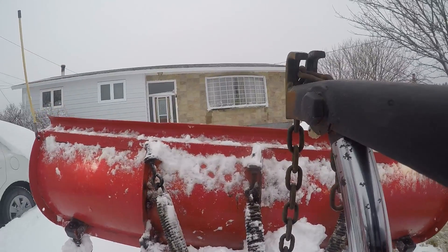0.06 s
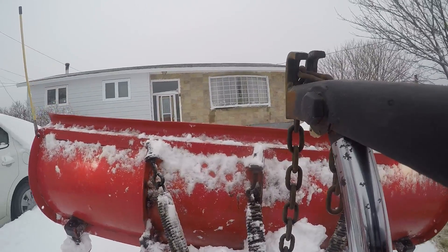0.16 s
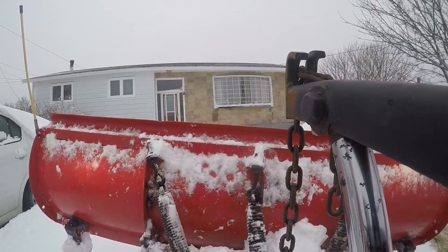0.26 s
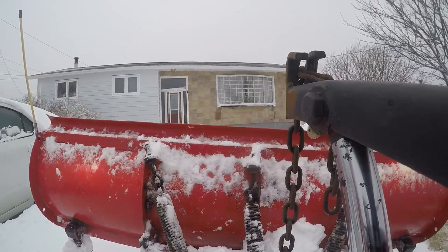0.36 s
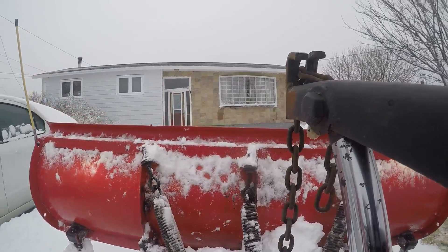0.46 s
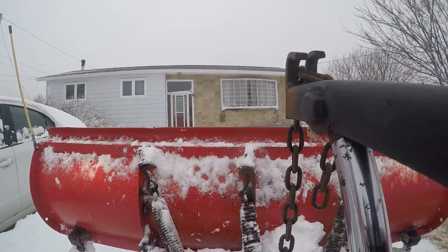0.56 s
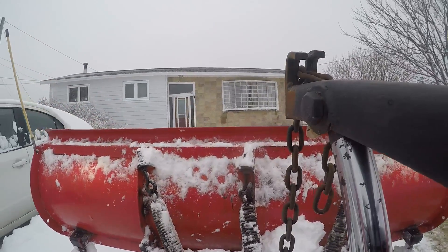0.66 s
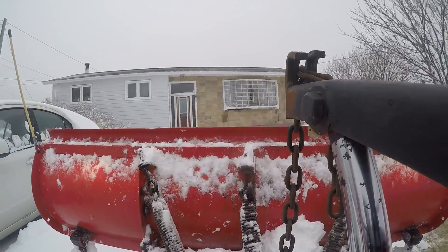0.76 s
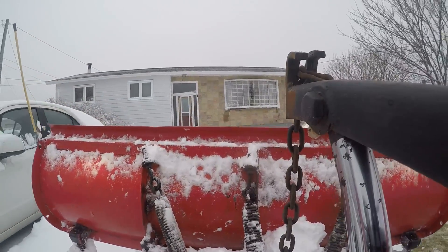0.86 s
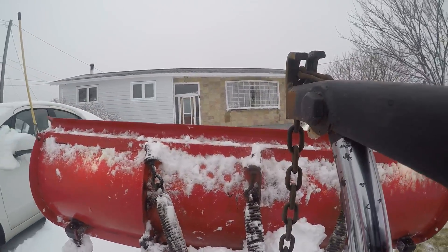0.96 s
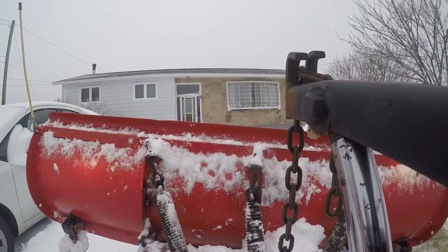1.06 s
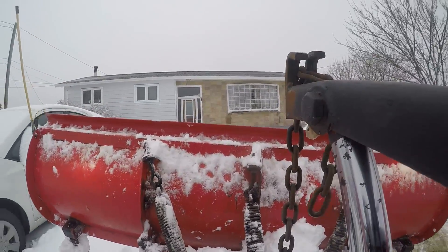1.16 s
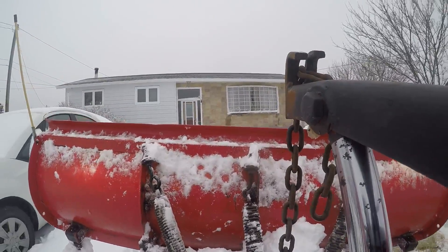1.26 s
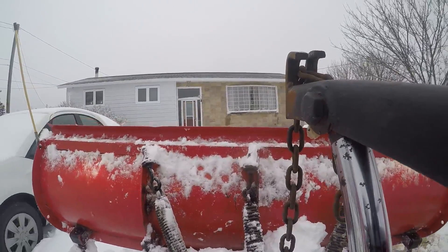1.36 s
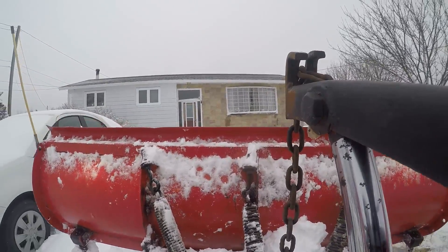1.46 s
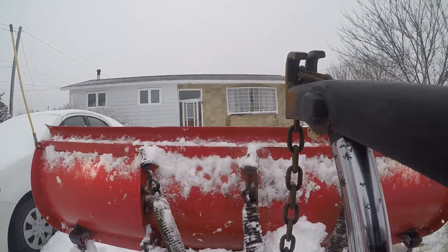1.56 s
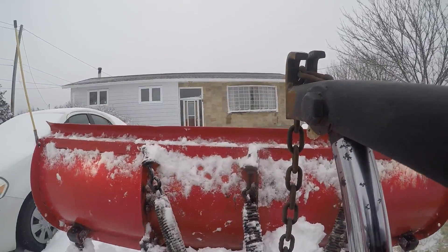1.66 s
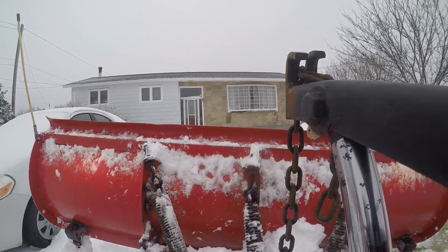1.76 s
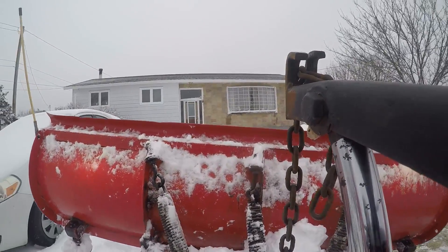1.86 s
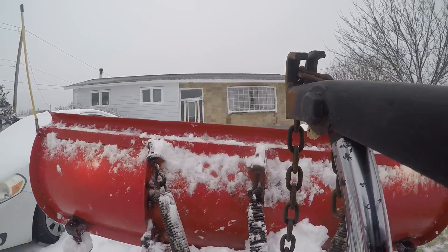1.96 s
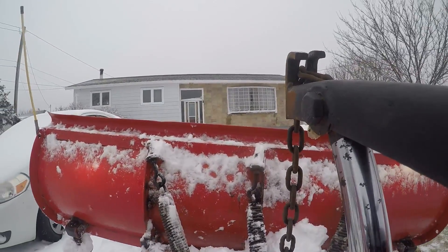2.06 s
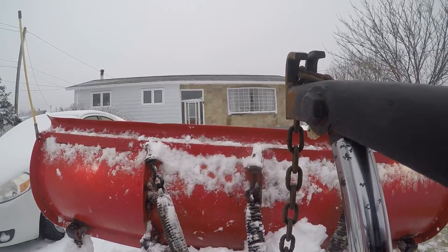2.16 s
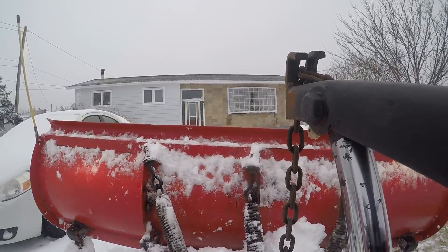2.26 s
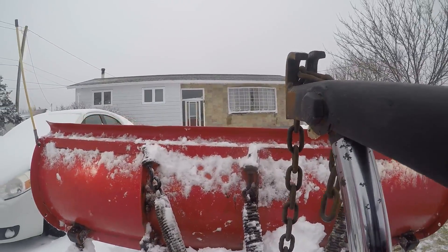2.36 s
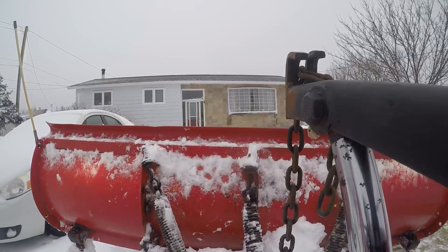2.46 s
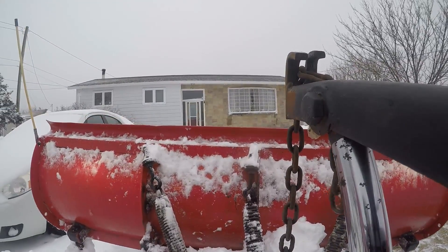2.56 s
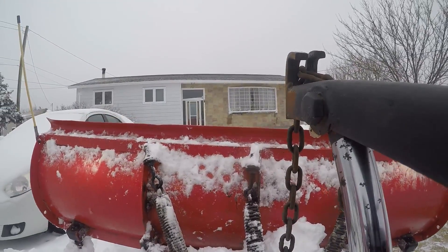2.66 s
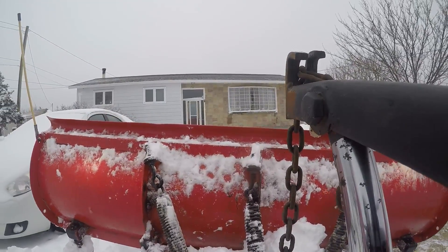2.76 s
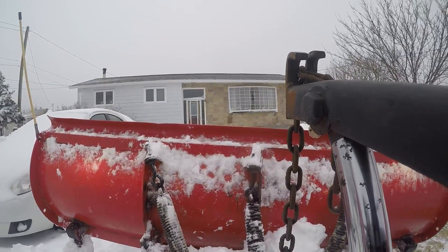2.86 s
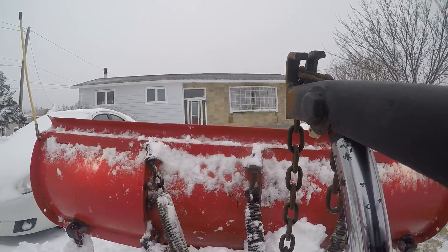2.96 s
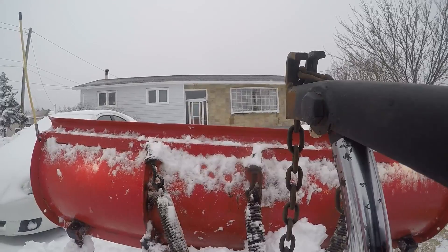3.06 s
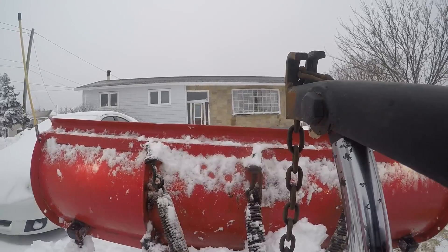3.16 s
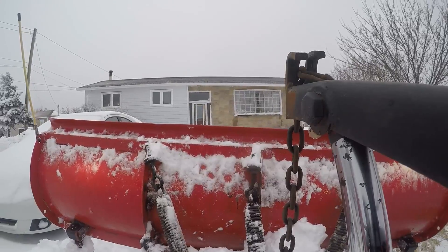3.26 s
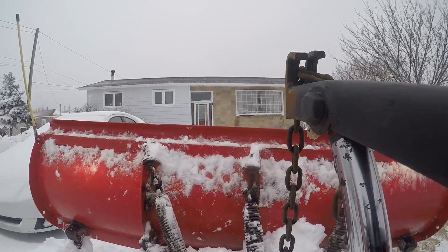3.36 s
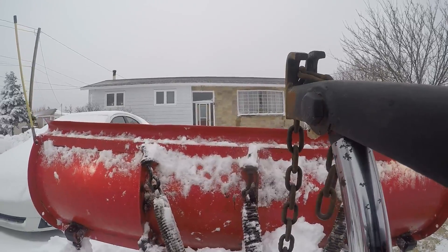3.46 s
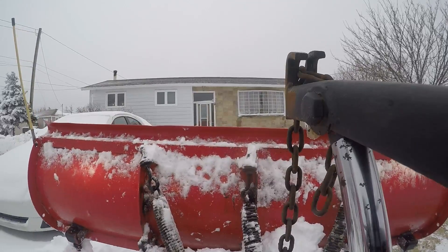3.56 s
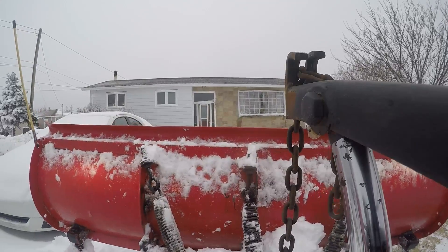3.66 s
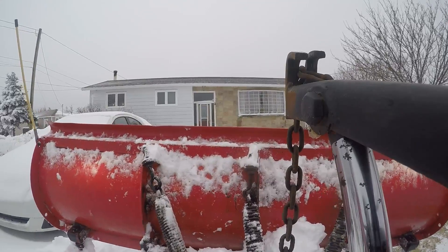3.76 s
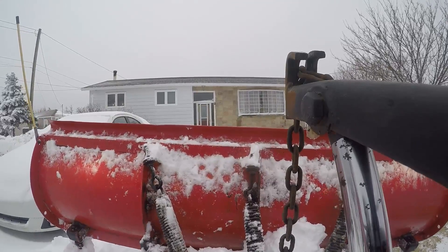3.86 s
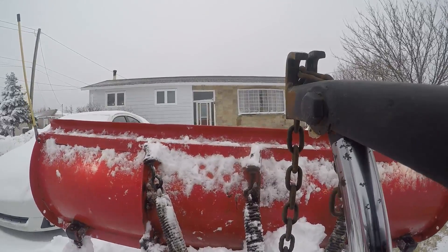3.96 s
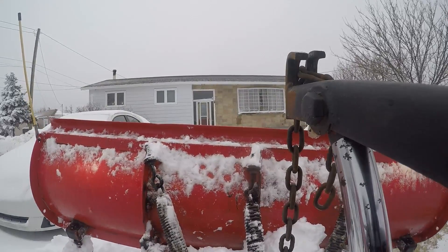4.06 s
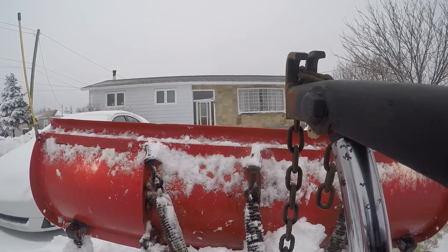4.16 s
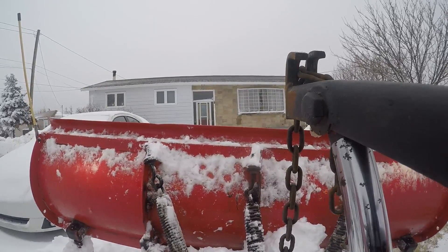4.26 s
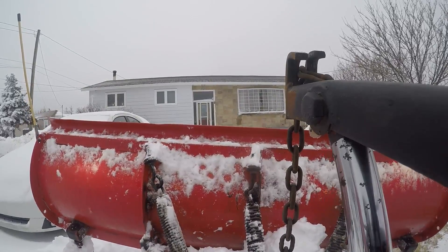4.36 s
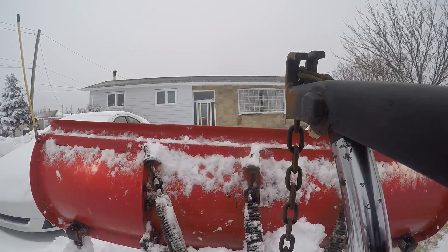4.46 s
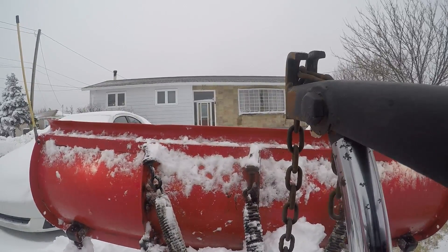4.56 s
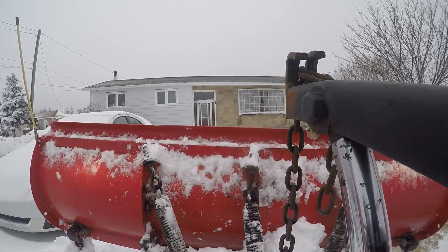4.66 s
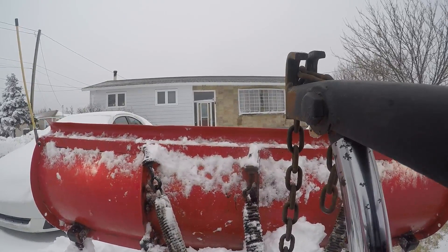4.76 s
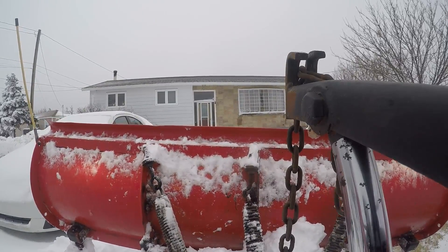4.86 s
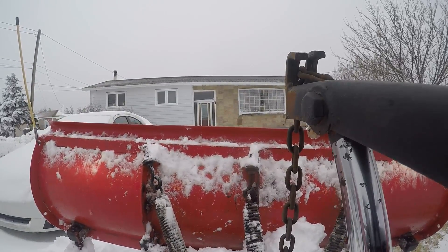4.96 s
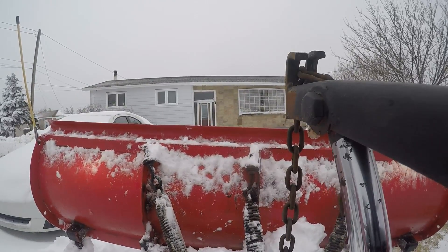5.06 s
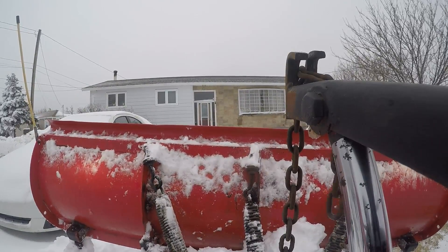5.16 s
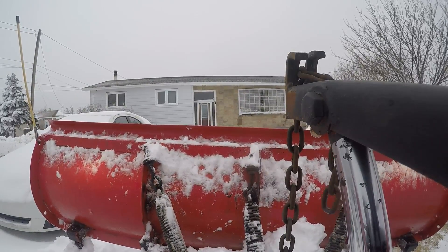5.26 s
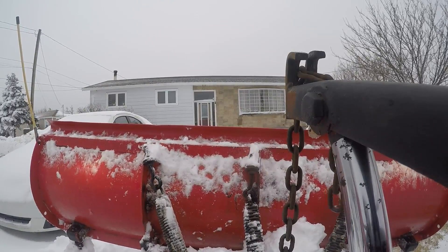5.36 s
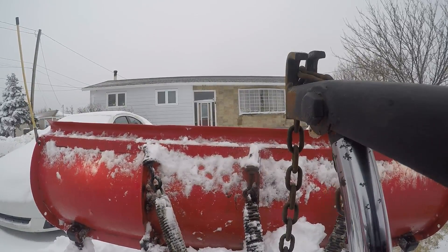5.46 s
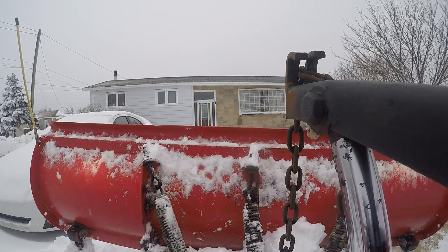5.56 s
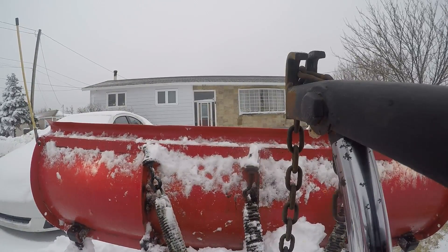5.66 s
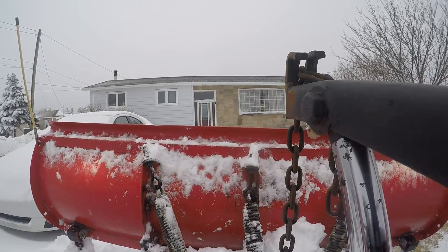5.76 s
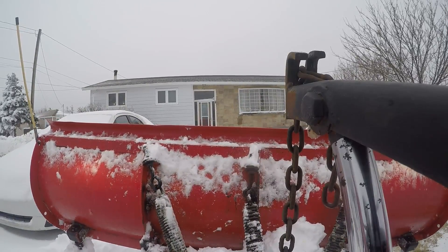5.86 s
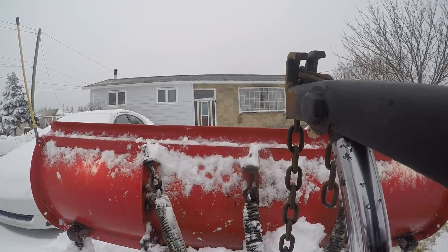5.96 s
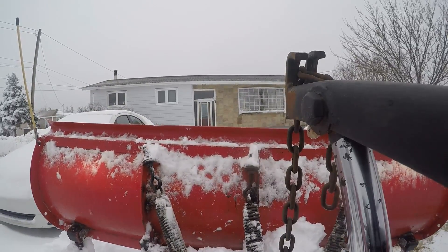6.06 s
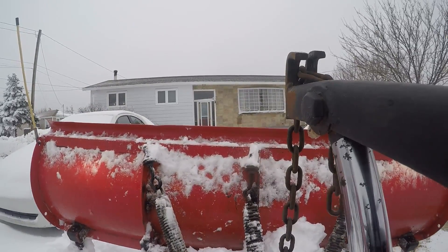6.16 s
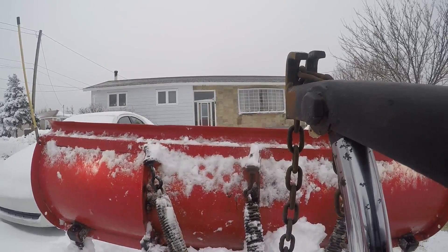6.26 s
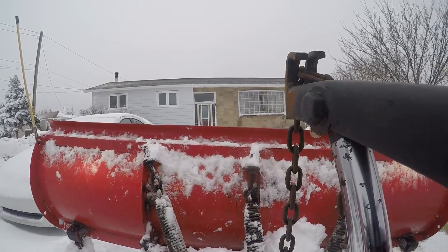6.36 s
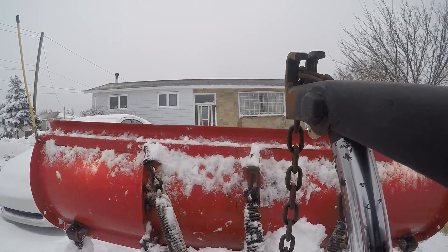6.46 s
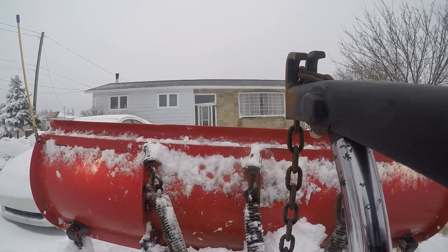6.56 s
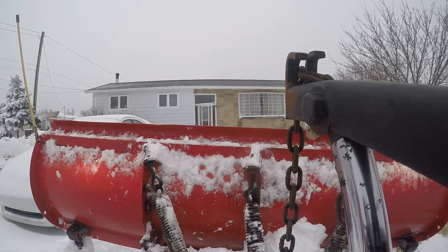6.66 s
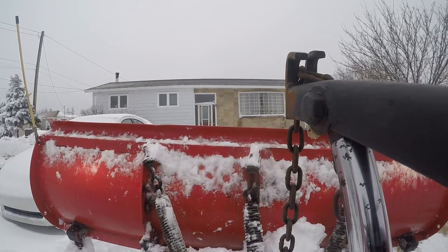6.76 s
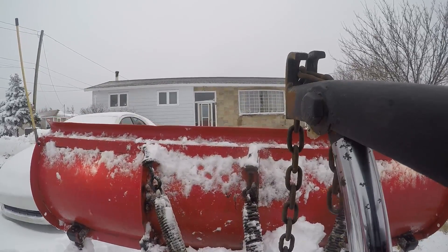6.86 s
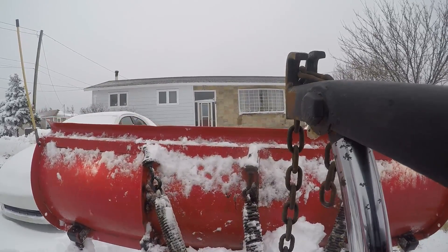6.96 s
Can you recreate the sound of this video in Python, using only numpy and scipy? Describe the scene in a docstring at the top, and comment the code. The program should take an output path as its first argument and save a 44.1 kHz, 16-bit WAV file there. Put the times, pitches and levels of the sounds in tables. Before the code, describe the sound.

A low, beating engine rumble with breathy fan noise runs throughout. Early on, rusty links clink, scrape and squeak, building to a cluster of violent, clipped metal bangs with short dull thuds. The throttle swells, then a gliding hydraulic moan, groaning packed snow, soft jolts and sparse chain ticks follow. The fan swells again, steel rubs, and a few last blade bangs land. Close microphone on the vehicle, open snowy driveway, no echo.

```python
"""Plow truck on a snowy driveway

A plow truck creeps along with its blade raised, heard close up from a microphone at the plow mount.
The exhaust throbs as a low note with a beat, and coloured noise makes the fan swell twice with the throttle.
A pump moans as a gliding tone; random fractures crunch the snow, which groans in rough low notes.
Decaying steel modes make the blade knock in its loose pivots, hard enough to overload the microphone,
and the lift chain clink and rattle; filtered grains and gliding notes make it rub, scrape and squeak."""
import sys
import numpy as np
from scipy import signal
from scipy.fft import rfft, irfft
from scipy.io import wavfile
from scipy.ndimage import uniform_filter1d

SR = 44100
rng = np.random.default_rng(int(sys.argv[2]) if len(sys.argv) > 2 else 0)


def store_pcm(level_fs):
    """Save levels as 16-bit WAV."""
    pcm = np.round(np.clip(level_fs, -1, 1) * 32767).astype(np.int16)
    wavfile.write(sys.argv[1], SR, np.atleast_2d(pcm).T)


N = 309141
TIME = np.arange(N) / SR

# note of the exhaust: (time [s], pitch [Hz])
THROB = [(0.0, 43.3), (0.17, 41.41), (2.22, 41.24), (2.71, 45.2), (3.08, 41.8), (3.32, 45.04),
         (4.63, 40.06), (4.84, 45.02), (7.01, 41.5)]
# exhaust throb: (time [s], level before the lope [dB])
EXHAUST = [(0, -8), (.2, -24.5), (.35, -8.5), (.8, -15.5), (1.22, -9.5), (1.49, -32.5), (1.74, -14.5),
           (2.55, -15.5), (3.4, -14.5), (3.68, -18), (3.85, -16.5), (4.05, -20), (4.53, -25.5),
           (4.61, -16.5), (4.98, -22.5), (5.08, -15), (5.17, -21.5), (5.62, -26.5), (6.02, -12),
           (6.3, -12.5), (6.48, -20.5), (6.66, -24), (6.79, -16.5), (7.01, -18.5)]
# engine effort, as the level of the fan against idle: (time [s], level [dB])
EFFORT = [(0, 15.5), (.55, 12.5), (1.17, 7.5), (1.45, -2.5), (2.22, -1.5), (2.62, 16), (2.9, 21),
          (3.42, 10), (4.15, 5.5), (5.45, 8), (6.02, 22), (6.5, 11), (7.01, 4)]
# the body booms as the truck takes up load: (middle [s], length [s], highest level [dB])
SURGES = [(0.358, 0.3, -26.5), (1.08, 0.21, -28), (1.74, 0.17, -29), (2.558, 0.47, -24.5),
          (2.955, 0.51, -26.5), (3.35, 0.38, -15.5), (3.819, 0.13, -23.5), (4.74, 0.16, -29),
          (5.856, 0.18, -29), (6.099, 0.3, -20), (6.521, 0.26, -28.5), (6.754, .12, -16)]
# drone of the truck body on the uneven ground: (time [s], level [dB])
DRONE_LEVEL = [(0, -37.5), (.8, -43.5), (1.08, -37.5), (1.55, -51.5), (2.0, -41), (2.5, -39.5), (3.4, -41),
               (4.15, -39.5), (5.25, -41), (5.7, -44), (6.0, -36), (6.45, -46), (7.01, -39)]
# colours of wallow, body boom, drone, machinery and fan: (frequency [Hz], density [dB per Hz])
WALLOW = [(18, -6), (24, -7), (33, 0), (38, 1), (50, -17.5)]
BOOM = [(18, -6.5), (30, -16), (42, -6), (58, 5.5), (76, -1), (92, -24), (130, -31)]
DRONE = [(85, 0), (105, -2.5), (125, 0), (150, -3), (190, -11), (260, -26), (500, -30.5)]
MACHINERY = [(300, -12), (620, -5), (770, -9), (900, -2.5), (1200, -22.5), (1330, -6), (1440, -2.5),
             (1560, 1.5), (1780, -11.5), (2020, 2.5), (2200, -16.5), (2600, -5.5), (3100, -12), (6000, -18)]
FAN = [(1290, -29.5), (1750, -8.5), (2200, -10.5), (2550, -1), (3050, -10), (3330, -6.5), (3700, -14),
       (4050, -10.5), (4400, -14), (4650, -13), (5400, -14), (5900, -18.5), (6400, -12.5), (6800, -20.5),
       (6970, -20.5), (7200, -28), (7650, -20.5), (8100, -22), (8650, -28.5), (9500, -23), (11200, -30.5),
       (13600, -29.5), (15500, -42)]
# resonances of the plow mount: (frequency [Hz], width [Hz], boost [dB])
MOUNT = [(771, 15.5, 12.5), (1102, 12, 7), (1334, 46, 12), (1573, 45, 4.5), (1753, 98, 12.5), (1967, 20, 6),
         (2413, 39, 4.5), (2760, 18, 6.5)]
# pump under load: (time [s], pitch [Hz], level before trim [dB])
PUMP = [(3.03, 285, -64), (3.12, 246, -40), (3.21, 208, -39), (3.29, 186, -48), (3.36, 190, -77),
        (3.86, 252, -72), (3.93, 243, -48), (4.12, 227, -42.5), (4.3, 222, -45), (4.6, 234, -44),
        (4.85, 248, -46.5), (5.01, 250, -48.5), (5.1, 250, -75)]
# packed snow groans under a tyre: (time [s], length [s], pitch [Hz], level [dB])
GROANS = [(3.539, 0.068, 175, -42.5), (3.774, 0.085, 222.4, -38), (3.874, 0.065, 280, -47.5),
          (4.524, 0.056, 283, -43), (4.662, 0.058, 210, -44.5)]
# tyres on snow: (time [s], level before trim [dB])
TREAD = [(0, -45), (.42, -39.5), (.65, -48.5), (1.03, -38.5), (1.19, -36.5), (1.32, -46.5), (1.45, -51),
         (2.15, -51), (3.0, -48), (5.6, -52.5), (6.15, -43.5), (6.6, -47.5), (7.01, -46)]
# lumps of snow giving way: (time [s], length [s], highest level [dB])
LUMPS = [(0.23, 0.027, -46), (0.298, 0.037, -38), (0.413, 0.014, -26), (0.473, 0.094, -37.5),
         (1.712, 0.021, -23), (3.373, 0.051, -38), (3.455, 0.024, -40.5), (3.77, 0.052, -47),
         (3.839, 0.081, -49), (5.341, 0.05, -45.5)]
# ruts that jolt the body: (time [s], peak before trim [dB])
JOLTS = [(3.378, -25), (3.82, -29), (3.98, -28), (4.14, -23.5), (4.57, -23.5), (4.683, -25.5), (5.011, -27),
         (5.262, -26.5)]
# colour of the snow: (frequency [Hz], density [dB per Hz])
SNOW = [(120, -4.5), (200, 4.5), (300, 3), (440, -6), (620, -10.5), (770, -11), (870, -21), (1020, -6.5),
        (1500, -22.5), (2500, -18.5), (6000, -53)]
# steel rubbing on steel: (time [s], length [s], pitch [Hz], level [dB])
RUBS = [(0.237, 0.11, 1540, -43.5), (1.13, 0.035, 1930, -32.5), (1.188, 0.028, 1980, -37),
        (1.71, 0.023, 1890, -44), (5.461, 0.041, 1780, -44.5), (6.229, 0.21, 1900, -41.5),
        (6.268, 0.18, 1970, -39), (6.77, 0.085, 1980, -47)]
# rusty faces grinding over each other: (time [s], length [s], level [dB], lowpass corner [Hz])
SCRAPES = [(0.405, 0.016, -34.5, 2180), (0.487, 0.018, -28, 6700), (0.505, 0.038, -38, 2400),
           (0.596, 0.0047, -39.5, 1760), (0.96, 0.014, -32.5, 1990), (1.064, 0.017, -29.5, 1340),
           (1.1, .075, -53, 1400), (1.114, 0.018, -31.5, 7400), (1.713, 0.015, -37, 3950),
           (3.204, 0.016, -54, 5300), (3.474, 0.0061, -40, 1730)]
# colour of the breaking rust: (frequency [Hz], density [dB per Hz])
RUST = [(500, -2), (1000, 2), (1900, -2), (2400, -2), (3200, -1), (3700, -6), (4700, -4), (5600, -9),
        (6400, -6), (7200, -17), (8400, -12), (14000, -21)]
# a dry joint squeaks: (time [s], length [s], first pitch [Hz], last pitch [Hz], level [dB])
SQUEAKS = [(1.68, 0.016, 1550, 1420, -31), (1.695, 0.0093, 1460, 1360, -26.5),
           (1.704, 0.008, 1440, 1570, -23), (1.708, .011, 1900, 2010, -26), (1.996, 0.021, 1880, 2420, -53),
           (3.519, 0.013, 2680, 2990, -45)]
# slack links jostle: (time [s], length [s], level [dB], treble against the middle [dB])
RATTLES = [(.25, 0.028, -42, -14), (0.304, .035, -41, -12), (0.823, 0.075, -44.5, -4),
           (0.879, 0.031, -44.5, 2), (.995, 0.029, -46, 0), (1.099, 0.017, -39, 0), (1.115, 0.028, -30, 3),
           (1.148, 0.057, -39, -2), (1.217, .032, -37, -7), (1.261, .035, -47, -5), (1.341, 0.019, -49, 5),
           (1.546, 0.021, -35, -9), (1.653, 0.041, -49, 1), (1.812, 0.021, -48, -3),
           (1.869, 0.015, -48.5, -1), (1.952, 0.038, -45, -7), (1.998, 0.028, -50, -1),
           (2.23, 0.03, -46, -10), (2.273, 0.071, -46.5, -13), (2.342, 0.021, -47, -18),
           (2.387, 0.017, -41.5, 1), (2.418, 0.016, -47, -2), (3.181, .03, -41, 1.5),
           (3.524, 0.019, -48, 2), (3.769, .035, -46, -11), (3.833, .045, -44.5, -4),
           (3.941, .025, -48.5, -10), (4.126, 0.018, -43, -1), (4.153, 0.023, -54, 5),
           (4.299, 0.021, -41, -5), (4.515, 0.018, -44.5, 2), (6.92, 0.017, -49.5, 12)]
# chain clinks: (time [s], peak [dB], high ring against low ring [dB],
# pitch of the link that rings most [Hz], its t60 [s])
CLINKS = [(0.1899, -22, -15, 1966, 0.036), (0.4236, -21, 6, 1930, 0.056), (0.504, -25, -13, 1770, .04),
          (0.517, -24.5, 1, 2580, .015), (.795, -24, 0, 2000, 0.086), (0.838, -29, -5, 2560, .02),
          (0.8852, -23.5, -6, 2730, .03), (1.003, -31, -15, 1930, 0.071), (1.1, -25, -4, 4100, .012),
          (1.116, -14.5, -6, 1760, 0.027), (1.16, -29, -5, 1930, .03), (1.217, -21, -14, 1930, .04),
          (1.233, -17, -4, 1965, .04), (1.3442, -24.5, -16, 1880, 0.044), (1.5445, -15, -27, 1890, 0.047),
          (1.723, -20.5, -12, 1830, 0.04), (1.956, -28.5, -8, 2000, .03), (1.9862, -23, -25, 1920, .035),
          (2.235, -30, -11, 1980, .035), (3.5224, -30.5, 5, 2980, .025), (3.658, -33, -14, 1790, .01),
          (3.8279, -24.5, -3, 2530, 0.038), (4.1298, -25.5, 1, 4470, 0.026),
          (4.2156, -28, -9.5, 1810, 0.057), (4.3, -27, -2, 4450, 0.025), (4.5156, -30, -4, 2092, 0.017),
          (6.003, -25.5, 0, 4343, 0.02), (6.405, -23.5, -18, 2030, 0.053)]
# modes of the slack links and of the chain: (frequency [Hz], level [dB], t60 [s])
SLACK_MODES = [(790, -10, .04), (1040, -8.5, 0.038), (1310, -1.5, 0.044), (1656, -0.5, .03),
               (1830, 2, .035), (1992, 5, .045), (2370, -1, 0.027), (2760, -3, 0.04), (3077, -1.5, 0.039),
               (3290, -4.5, 0.015), (4130, 0, .018), (4410, -1.5, 0.032), (4535, -10.5, 0.023),
               (5300, -6, .015), (6300, -14, 0.011)]
CHAIN_MODES = [(1097, -9.5, .035), (1322, -1, 0.027), (1640, -1, 0.018), (1943, 9.5, 0.018),
               (2250, -7, 0.045), (3040, -13.5, 0.1), (3220, -1, 0.015), (4110, 0.5, 0.011),
               (4650, 1, 0.023), (6130, -19.5, 0.021)]
# blade knocks: (time [s], level before trim [dB], thud before trim [dB], crack before trim [dB],
# slow flex of the blade [dB], after-ring of the frame [dB])
KNOCKS = [(.982, -29, 15, -31, -23, -25), (1.142, -14, -16, -30, -30, -20), (1.1826, 9, -13, -13, -43, -24),
          (1.2421, 12.5, -11.5, -16, -42, -33), (1.37, 3, -12, -8, -45, -19.5),
          (1.389, -19.5, -1, -25, -30, -22), (1.401, -20.5, -11, -23, -36, -31),
          (1.427, -22, -9, -35, -18, -28), (1.5117, -20, -28, -32, -9, -25),
          (1.693, 8.5, -11, -17, -24, -26.5), (1.723, -27, 12, -30, -8, -11), (1.77, -20.5, 3, -8, -11, -8),
          (1.7857, -6, -12, -12, -20.5, -17.5), (1.9146, -20, 2.5, -18, -6.5, -13),
          (2.1098, -4.5, -2, -22, -35, -31), (2.2151, -16, 0, -15, -7.5, -17),
          (3.829, -29.5, 4, -20, -25, -26), (4.2995, -34, -9, -29, -22, -5),
          (6.0825, -18.5, -11, -11, -32, -17), (6.578, -1, 1, -24, -19, -24),
          (6.606, -21, 3.5, -24, 0, -20), (6.7314, 13, -7.5, -8.5, -25.5, -35)]
# modes of pivot, blade panel, slow bending of blade and frame, and the faint ring left in the frame:
# (frequency [Hz], level [dB], t60 [s])
PIVOT_MODES = [(1466, -8, 0.033), (1815, 15, 0.012), (2166, 11, 0.017), (3230, -4.5, 0.024),
               (3280, -11.5, 0.014), (3770, -9, 0.019), (4248, -9, 0.021), (4830, -14, 0.011),
               (5250, -9, 0.01), (5770, -11, 0.01), (6600, -26, 0.009)]
PANEL_MODES = [(109, -11.5, 0.2), (180, -12, 0.078), (272, 11.5, 0.014), (412, 6, 0.019), (577, 3.5, 0.013),
               (740, -4.5, 0.002), (1064, 7, 0.0049)]
FLEX_MODES = [(119.4, -1.5, 0.23), (175, -1, 0.1), (236, -5.5, 0.32), (320, -2.5, 0.046)]
FRAME_MODES = [(771, -3, 0.13), (1296, -7.5, 0.096), (1690, -16, .07), (1900, -11, 0.044),
               (2070, -6, 0.043), (2920, -2, .04)]
# colours of bare steel contact, blade and chain: (frequency [Hz], density [dB per Hz])
CRACK = [(3000, -23), (5000, -24), (5600, 19.5), (6500, 13), (7100, -20), (7800, 4), (8500, -21.5),
         (9100, -15), (9700, -8), (11200, -5), (15000, -26.5)]
CHINK = [(700, 0.5), (1900, 7.5), (3000, 1), (4500, -13.5), (6500, -26.5), (8000, -38), (14000, -41)]

# levels at idle (dB), and the dB that a layer gains for one dB of effort
FAN_DB = -61.5
MACHINERY_DB, MACHINERY_PER_EFFORT = -55, 0.5
BOOM_DB, BOOM_PER_EFFORT = -37, 0.33
# how far these layers waver (dB)
DRONE_WAVER_DB, MACHINERY_WAVER_DB, FAN_WAVER_DB = 1.6, .8, .8
# the frame wallows on its springs, this far below the throb
WALLOW_DB = -11
# the next engine order lies a quarter above the note and beats against it;
# it follows the throb only in part, so strong throbbing is steadier
BEAT_DB, BEAT_PER_THROB = -13.5, 0.79
LOPE_SHARE = 0.24
# level trims (dB)
PUMP_TRIM_DB, TREAD_TRIM_DB, JOLT_TRIM_DB = 2.0, -1.1, 4.0
KNOCK_TRIM_DB, THUD_TRIM_DB, CRACK_TRIM_DB = -2.0, -0.5, -14.0
# spread of mode strength from one strike to the next (dB)
PIVOT_SCATTER_DB, CHAIN_SCATTER_DB = 1.5, 3
# contacts a second for each slack link, and the spread of their strength (dB)
JOSTLE_RATE, JOSTLE_SPREAD_DB = 380, 2.5
# the pivot seats after a blow: how soon that damps its ring (s), and the share that rings on
SEAT_S, UNDAMPED_SHARE = .0045, .3
TOP_HZ = 15700


def undb(db):
    """Decibels to gain."""
    return 10 ** (np.asarray(db) / 20)


def unit(x):
    """Scale to an rms of one."""
    return x / np.sqrt(np.mean(x ** 2) + 1e-18)


def peak(x):
    """Scale to a peak of one."""
    return x / np.abs(x).max()


def curves(table):
    """The columns of a table as sample-by-sample controls."""
    s, *columns = np.transpose(table)
    return [np.interp(TIME, s, c) for c in columns]


def add(out, s, x):
    """Mix x into out from time s."""
    i = max(int(s * SR), 0)
    out[i:i + len(x)] += x[:max(N - i, 0)]


def colour(x, points):
    """Give x a spectrum of (Hz, dB) points, falling away beyond its ends; rms one."""
    hz, db = np.transpose(points)
    f = np.maximum(np.fft.rfftfreq(len(x), 1 / SR), 1)
    ends = 1 / np.sqrt((1 + (hz[0] / f) ** 4) * (1 + (f / hz[-1]) ** 4))
    gain = undb(np.interp(np.log(f), np.log(hz), db))
    return unit(irfft(rfft(x) * ends * gain, len(x)))


def walk(rate):
    """Smooth chance with a spread of one, drawn anew at this rate (Hz)."""
    k = max(int(SR / rate), 1)
    steps = np.repeat(rng.standard_normal(N // k + 1), k)
    return unit(uniform_filter1d(uniform_filter1d(steps, k), k)[:N])


def ring(modes, scatter_db, detune):
    """Decaying modes, one a row; every blow lands elsewhere and weights them anew."""
    hz, db, t60 = np.transpose(modes)[:, :, None]
    size, shift = rng.standard_normal((2, len(modes), 1))
    t = TIME[:SR // 4]
    decay = np.exp(-np.log(1000) * t / t60)
    return undb(db + scatter_db * size) * decay * np.sin(2 * np.pi * hz * (1 + detune * shift) * t)


def grains(rate, spread_db, count=N):
    """Tiny random impacts, so many a second, most of them weak."""
    chance, size, sign = rng.random(count), rng.exponential(size=count), rng.standard_normal(count)
    return (chance < rate / SR) * np.sign(sign) * undb(spread_db * np.minimum(size, 4))


def lowpass(x, hz):
    """A soft contact cannot excite the highest frequencies."""
    return signal.sosfilt(signal.butter(3, min(hz, .45 * SR), fs=SR, output="sos"), x)


def mount(x):
    """Sound carried through the steel mount picks up its resonances; rms one."""
    for hz, width, db in MOUNT:
        x = x + (undb(db) - 1) * signal.lfilter(*signal.iirpeak(hz, hz / width, fs=SR), x)
    return unit(x)


def engine():
    """The exhaust throbs, shakes the body and pulses machinery and fan; effort lifts boom, machinery and fan."""
    hz, = curves(THROB)
    exhaust_db, = curves(EXHAUST)
    effort_db, = curves(EFFORT)
    drone_db, = curves(DRONE_LEVEL)
    phase = 2 * np.pi * np.cumsum(hz) / SR
    # unequal cylinders make the note lope
    lope = unit(1 + LOPE_SHARE * walk(45))
    note = unit(np.sin(phase + 0.4 * walk(25))) * undb(exhaust_db)
    beat = unit(np.sin(phase + phase / 4 + walk(6))) * undb(BEAT_DB + BEAT_PER_THROB * exhaust_db)
    wallow = colour(rng.standard_normal(N), WALLOW) * undb(WALLOW_DB + exhaust_db)

    shake = undb(BOOM_DB + BOOM_PER_EFFORT * effort_db)
    for s, length, db in SURGES:
        add(shake, s - length / 2, undb(db) * np.hanning(int(length * SR)))
    boom = colour(rng.standard_normal(N), BOOM) * shake
    drone = colour(rng.standard_normal(N), DRONE) * undb(drone_db + DRONE_WAVER_DB * walk(7.9))

    pulsing = 1 + 0.055 * np.cos(phase)
    machinery_db = MACHINERY_DB + MACHINERY_PER_EFFORT * effort_db + MACHINERY_WAVER_DB * walk(31)
    machinery = mount(colour(rng.standard_normal(N) * pulsing, MACHINERY)) * undb(machinery_db)
    fan_db = FAN_DB + effort_db + FAN_WAVER_DB * walk(45)
    fan = mount(colour(rng.standard_normal(N) * pulsing, FAN)) * undb(fan_db)
    return (note + beat) * lope + wallow + boom + drone + machinery + fan


def pump():
    """A soft, nearly pure moan that bends with the load."""
    hz, db = curves(PUMP)
    phase = 2 * np.pi * np.cumsum(hz * (1 + .004 * walk(40))) / SR
    moan = unit(np.sin(phase) + undb(-28.5) * np.sin(2 * phase))
    return moan * undb(db + PUMP_TRIM_DB + .5 * walk(25))


def groaning():
    """Cold snow sticks and slips under the tread in a short, rough, low note."""
    out = np.zeros(N)
    for s, length, hz, db in GROANS:
        count = int(length * SR)
        phase = 2 * np.pi * np.cumsum(hz * (1 + .1 * walk(200)[:count])) / SR
        note = np.sin(phase) + undb(-16.5) * np.sin(2 * phase)
        add(out, s, unit(note * np.hanning(count) ** .5) * undb(db))
    return out


def tyres():
    """Snow packs in small fractures under the tread; lumps collapse and ruts jolt the body."""
    tread_db, = curves(TREAD)
    load = undb(tread_db + TREAD_TRIM_DB + 3.26 * walk(45))
    for s, length, db in LUMPS:
        # the pressure builds a little quicker than it eases
        progress = np.linspace(0, 1, int(length * SR))
        add(load, s, undb(db) * np.sin(np.pi * progress ** 0.92))
    out = mount(colour(grains(1700, 1.57), SNOW)) * load
    for s, db in JOLTS:
        jolt = peak(lowpass(ring(FLEX_MODES, scatter_db=3.0, detune=0.049).sum(0), 107))
        add(out, s, undb(db + JOLT_TRIM_DB) * jolt)
    return out


def rubbing():
    """Stick-slip grains excite a steel resonance while the parts slide."""
    out = np.zeros(N)
    for s, length, hz, db in RUBS:
        count = int(length * SR)
        slips = grains(1500, 3.0, count=count)
        resonance = signal.lfilter(*signal.iirpeak(hz, 10, fs=SR), slips)
        squeak = mount(lowpass(resonance, 3700))
        add(out, s, unit(squeak * np.hanning(count) ** 0.067) * undb(db))
    return out


def scraping():
    """Rust breaks in a short burst of separate grains that rises fast and dies away."""
    out, t = np.zeros(N), TIME[:SR // 4]
    for s, length, db, top_hz in SCRAPES:
        progress = np.minimum(t / length, 1)
        grit = grains(2400, 2.8, count=len(t)) * np.sin(np.pi * np.sqrt(progress))
        burst = mount(lowpass(colour(grit, RUST), top_hz))
        # the root makes the level hold over the burst alone
        add(out, s, undb(db) * burst * np.sqrt(length / t[-1]))
    return out


def squeaking():
    """Stick-slip in a dry joint: a brief, ragged gliding note with overtones."""
    out = np.zeros(N)
    for s, length, first_hz, last_hz, db in SQUEAKS:
        count = int(length * SR)
        wobble = 1 + .035 * walk(900)[:count]
        phase = 2 * np.pi * np.cumsum(np.linspace(first_hz, last_hz, count) * wobble) / SR
        note = np.sin(phase) + undb(-23) * np.sin(2 * phase) + undb(-32) * np.sin(3 * phase)
        add(out, s, unit(note * np.hanning(count) ** 0.5) * undb(db))
    return out


def rattling():
    """Three slack links jostle in a flurry of small contacts, each link with its own ring."""
    out, t = np.zeros(N), TIME[:SR // 4]
    high = np.array(SLACK_MODES)[:, 0] > 2600
    for s, length, db, treble_db in RATTLES:
        shaking = np.sin(np.pi * np.sqrt(np.minimum(t / length, 1)))
        flurry = 0
        for link in range(3):
            modes = ring(SLACK_MODES, scatter_db=CHAIN_SCATTER_DB, detune=.007)
            link_ring = modes[~high].sum(0) + undb(treble_db) * modes[high].sum(0)
            contacts = grains(JOSTLE_RATE, JOSTLE_SPREAD_DB, count=len(t)) * shaking
            flurry = flurry + signal.fftconvolve(contacts, link_ring)[:len(t)]
        add(out, s, undb(db) * unit(lowpass(flurry, 4700)) * np.sqrt(length / t[-1]))
    return out


def chain():
    """Rusty links strike and skitter against each other, over a faint ticking that follows the tread."""
    out, t = np.zeros(N), TIME[:SR // 4]
    high = np.array(CHAIN_MODES)[:, 0] > 2500
    for s, peak_db, high_db, hz, t60 in CLINKS:
        modes = ring(CHAIN_MODES, scatter_db=CHAIN_SCATTER_DB, detune=0.0083)
        neighbours = peak(modes[~high].sum(0) + undb(high_db) * modes[high].sum(0))
        struck = ring([(hz, -8, t60)], scatter_db=0, detune=0.0035)[0]
        grit = colour(rng.standard_normal(len(t)), CHINK) * np.exp(-t / 0.0054)
        link = lowpass(neighbours, 3700) + struck + undb(0.7 * high_db - 7.5) * grit
        # one full strike, then weaker contacts that die away
        skitter = 0.42 * grains(700, 1.6, count=len(t)) * np.exp(-t / 0.008)
        skitter[0] = 1
        add(out, s, undb(peak_db) * peak(signal.fftconvolve(link, skitter)[:len(t)]))
    shaking_db, = curves(TREAD)
    tick = ring(CHAIN_MODES, scatter_db=CHAIN_SCATTER_DB, detune=0.006).sum(0)
    ticks = signal.fftconvolve(grains(50, 1.1), tick)[:N]
    return out + unit(lowpass(ticks, 2400)) * undb(shaking_db - 7)


def blade():
    """A sharp crack rings the pivot until it seats, thuds the panel, bends the blade and rings the frame."""
    out, t = np.zeros(N), TIME[:SR // 4]
    seating = UNDAMPED_SHARE + (1 - UNDAMPED_SHARE) * np.exp(-(t / SEAT_S) ** 4)
    for s, db, thud_db, crack_db, flex_db, frame_db in KNOCKS:
        steel = peak(lowpass(ring(PIVOT_MODES, scatter_db=PIVOT_SCATTER_DB, detune=0.0043).sum(0), 6000))
        thud = peak(lowpass(ring(PANEL_MODES, scatter_db=5.5, detune=0.079).sum(0), 1300))
        flex = peak(ring(FLEX_MODES, scatter_db=3.5, detune=0.007).sum(0))
        frame = peak(ring(FRAME_MODES, scatter_db=2.0, detune=0.0034).sum(0))
        crack = colour(rng.standard_normal(len(t)), CRACK) * np.exp(-t / 0.001)
        # panel and blade start against the swing of the pivot
        blow = steel * seating - undb(thud_db + THUD_TRIM_DB) * thud - undb(flex_db) * flex
        blow = blow + undb(frame_db) * frame + undb(crack_db + CRACK_TRIM_DB) * crack
        add(out, s, undb(db + KNOCK_TRIM_DB) * blow)
    return out


def scene():
    """Everything is close to one microphone, and the snow returns no echo."""
    truck = engine() + pump()
    snow = groaning() + tyres()
    friction = rubbing() + scraping() + squeaking()
    return (truck + snow + friction + rattling() + chain() + blade())[None]


def record(dry):
    """The microphone flattens the hardest knocks against a rounded ceiling; the top is cut."""
    clipped = dry / (1 + (dry / .98) ** 8) ** (1 / 8)
    return signal.sosfilt(signal.ellip(8, .2, 70, TOP_HZ, fs=SR, output="sos"), clipped)


dry = scene()
out = record(dry)
store_pcm(out)
```